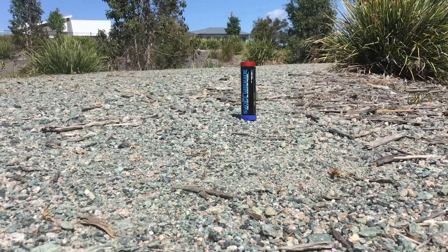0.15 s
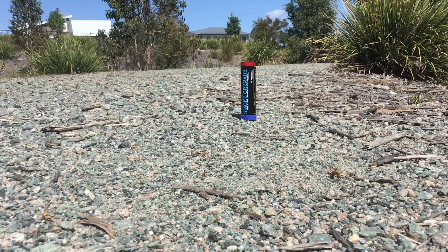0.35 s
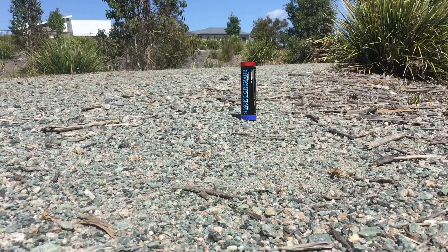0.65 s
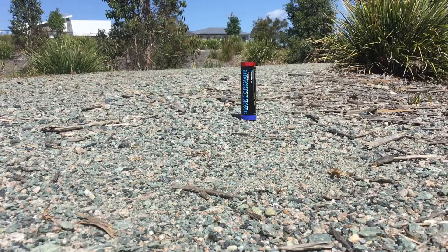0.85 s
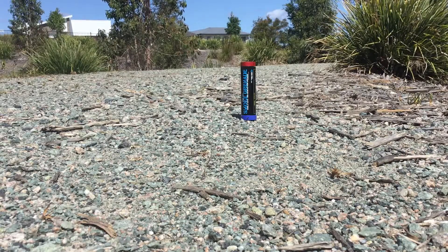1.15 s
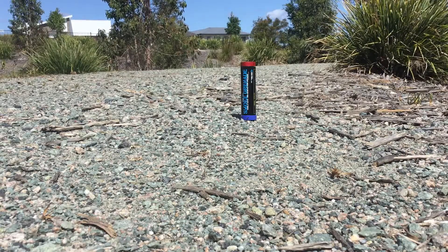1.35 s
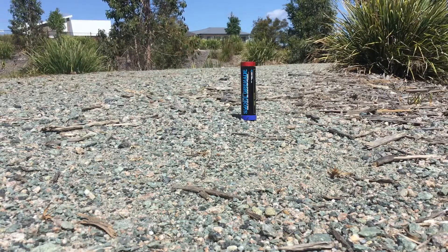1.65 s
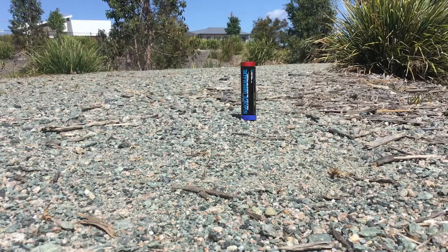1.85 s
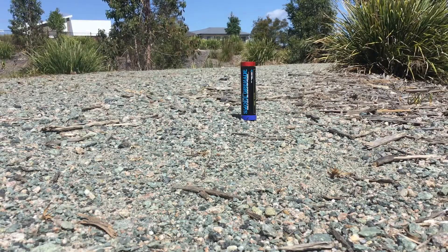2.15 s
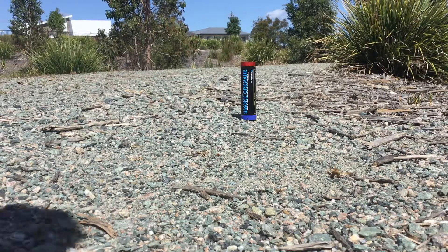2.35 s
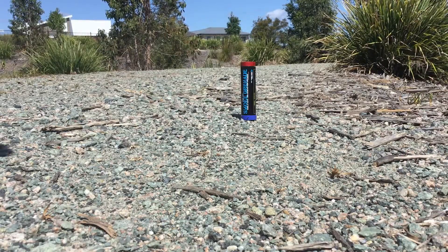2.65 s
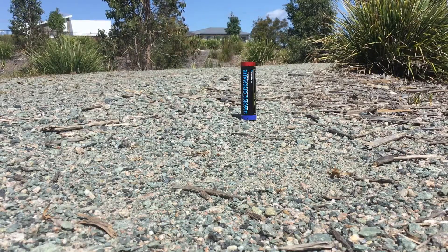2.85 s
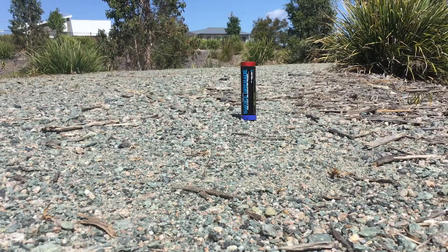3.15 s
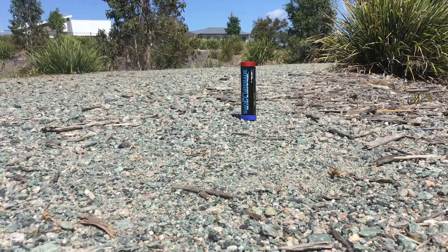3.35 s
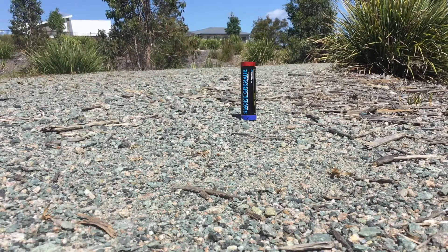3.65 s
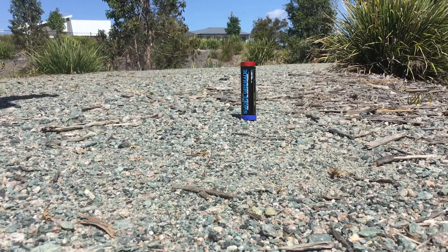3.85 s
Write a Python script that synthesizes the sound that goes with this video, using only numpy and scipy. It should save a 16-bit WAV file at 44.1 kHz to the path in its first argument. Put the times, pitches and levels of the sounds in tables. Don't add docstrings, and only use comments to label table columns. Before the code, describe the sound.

A walker shifts lightly on gravel, small stones ticking, then takes three loud crunchy steps close to a low microphone, pebbles scattering between them; soft cloth rustle and faint far traffic rumble in open air.

```python
import sys
import numpy as np
from scipy import signal
from scipy.io import wavfile

SR = 44100
rng = np.random.default_rng(int(sys.argv[2]) if len(sys.argv) > 2 else 0)


def generate_wav(signal):
    frames = np.transpose(np.atleast_2d(signal))
    scaled = np.clip(frames, -1, 1) * 32767
    pcm = np.round(scaled).astype(np.int16)
    wavfile.write(sys.argv[1], SR, pcm)


def elevation(decibels):
    levels = np.asarray(decibels, float)
    return 10 ** (levels / 20)


N = 176400
NEAR_S = 2.83


def rms_one(x):
    return x / np.sqrt(np.mean(x ** 2) + 1e-20)


def in_time(rows):
    s, *columns = np.transpose(rows)
    return [np.interp(np.arange(N) / SR, s, c) for c in columns]


def at_hz(points, hz):
    points_hz, points_db = np.transpose(points)
    return np.interp(np.log(hz), np.log(points_hz), points_db)


def drift(rate):
    r = np.exp(-80 * np.pi * rate / SR)
    noise = rng.standard_normal(N // 40 + 2002)
    slow = signal.lfilter([1], [1, -2 * r, r * r], noise)[2000:]
    return np.interp(np.arange(N) / 40, np.arange(len(slow)), rms_one(slow))


def ring(clicks, hz, t60):
    r, w = elevation(-60 / (t60 * SR)), 2 * np.pi * hz / SR
    return signal.lfilter([0, np.sin(w)], [1, -2 * r * np.cos(w), r * r], clicks + 1e-18)


def band_pass(x, low_hz, high_hz):
    return signal.sosfilt(signal.butter(2, [low_hz, high_hz], "band", fs=SR, output="sos"), x)


def banded_noise(spectrum, patchy_db):
    out, edges = 0, 28 * 2 ** np.arange(0, 9.4, 1 / 3)
    white = rng.standard_normal((2, N + SR // 4))
    for k, (low, high) in enumerate(zip(edges, edges[1:])):
        band = band_pass(white[k % 2], low, high)[-N:]
        hz = np.sqrt(low * high)
        below_db = min(0, 30 * np.log2(hz / spectrum[0][0]))
        out = out + elevation(at_hz(spectrum, hz) + below_db + patchy_db * drift(4.5)) * band
    return rms_one(out)


def add(track, s, sound):
    i = int(s * SR)
    track[i:i + len(sound)] += sound[:len(track) - i]


def traffic():
    # f/Hz, level/dB per Hz
    rumble_colour = [(18, -45), (30, -29), (55, 1), (183, -7.5), (382, -14.5), (645, -20.5), (1100, -37),
                     (10900, -47.5), (15800, -52)]
    # t/s, level/dB
    swell = [(0, -61.5), (1.3, -62), (2.2, -58), (4, -59)]
    return elevation(in_time(swell)[0] + 3.0) * banded_noise(rumble_colour, patchy_db=1.2)


def cloth():
    # t/s, level/dB
    rubbing = [(0, -80), (.3, -76.5), (.6, -85), (1.0, -75.5), (1.2, -81), (1.42, -85.5), (1.6, -75),
               (1.88, -83.5), (2.1, -71.5), (2.75, -68), (3.55, -65.5), (3.72, -72), (4, -65.5)]
    # f/Hz, level/dB per Hz
    fabric_colour = [(530, -36), (900, 0), (2460, -2), (2850, -2.5), (3370, -1.5), (15800, -20.5)]
    # t/s, level/dB, half length/s, lowest f/Hz, highest f/Hz
    swishes = [
        (1.647, -58.5, 0.012, 3240, 5160),
        (2.144, -53.5, 0.031, 4020, 9400),
        (3.104, -47.5, 0.0013, 10300, 12900),
        (3.306, -45.5, 0.012, 3800, 9400),
        (3.39, -49, 0.0033, 4500, 15000),
    ]
    out = elevation(in_time(rubbing)[0] + 6) * banded_noise(fabric_colour, patchy_db=0.8)
    white, t = rng.standard_normal(N), np.arange(N) / SR
    for s, db, half_s, low_hz, high_hz in swishes:
        hiss = rms_one(band_pass(white, low_hz, high_hz) + 0.092 * white)
        out = out + elevation(db) * hiss * np.exp(-((t - s) / half_s) ** 2)
    return out


def pebbles():
    # t/s, peak
    # level/dB, f/Hz
    loose_knocks = [(0.0506, -48, 3330), (0.0775, -50, 2400), (0.1004, -42.5, 2560), (0.128, -53, 1750),
                    (0.1812, -43.5, 2010), (0.2246, -39.5, 2930), (0.2366, -42, 1120), (0.3732, -52.5, 2460),
                    (0.4208, -44, 2900), (0.4505, -43, 3250), (0.471, -46, 1120), (0.4893, -47, 2480),
                    (0.5114, -53, 3080), (0.6384, -47.5, 2630), (0.647, -48, 4630), (0.6736, -44.5, 2630),
                    (0.707, -52, 2970), (0.7466, -48.5, 2730), (0.759, -49.5, 1950), (0.827, -52.5, 2420),
                    (0.88, -36, 2450), (0.954, -53.5, 2580),
                    (1.5268, -54.5, 1170), (1.5756, -47, 1310), (1.6026, -48.5, 1320), (1.6983, -47, 1350),
                  (1.7373, -50, 1160), (1.774, -51.5, 1120), (1.802, -48, 1200), (1.826, -51.5, 1090),
                  (1.928, -49, 1680), (1.959, -44.5, 2480), (2.0626, -34.5, 1165), (2.088, -44, 2390),
                  (2.207, -43.5, 2430), (2.371, -46.5, 2320), (2.457, -48, 1150), (2.5636, -44.5, 2230),
                  (2.7104, -47.5, 2360), (2.818, -36.5, 2570), (2.8473, -26, 1090),
                    (.0288, -57, 2640), (.387, -61, 2400), (0.529, -53, 2420), (.66, -54, 3100),
                    (0.7788, -55, 2460), (.8579, -64, 2570), (1.2341, -61, 2370), (1.351, -74, 2600),
                    (1.3663, -65, 2620), (1.378, -67, 2600), (1.456, -59.5, 2450), (1.539, -58, 1250),
                    (1.611, -53, 1300), (1.712, -59, 2500), (1.837, -60, 2400), (2.019, -54, 2570),
                    (2.079, -54, 2500), (2.274, -46.5, 2300), (2.502, -52, 6000), (2.572, -51, 2960),
                    (3.584, -47, 1800), (3.721, -44, 1630), (3.728, -46, 2000), (3.772, -41, 1900),
                    (3.776, -45, 1700), (3.790, -40, 2000)]
    # t/s, peak level/dB, f/Hz, overtone level/dB
    near_knocks = [(2.864, -28, 1290, -8), (2.871, -33.5, 1560, -4.5), (2.885, -21, 1670, -10),
                   (2.897, -34, 2330, -16), (2.935, -33, 1320, -7), (2.953, -35.5, 2410, -15),
                   (2.961, -35.5, 2470, -2.5), (2.969, -29, 1280, -21), (2.981, -40, 2400, 4),
                   (2.991, -43, 2370, -13), (2.998, -40, 2350, -13), (3.015, -42, 2000, -3),
                   (3.046, -39, 2260, -11), (3.058, -43, 2400, -7), (3.066, -41, 2420, -13),
                   (3.088, -44, 3030, -5), (3.116, -32.5, 3170, -4.5), (3.124, -42, 3000, 0),
                   (3.152, -40, 2200, 3), (3.161, -39, 3560, -3), (3.217, -36, 4200, -33),
                   (3.24, -38.5, 2130, -2), (3.272, -13, 597, -26.5), (3.280, -20, 620, -15),
                   (3.315, -15, 780, -22.5), (3.339, -16.5, 1110, -9), (3.363, -25, 1200, -8),
                   (3.372, -22, 1120, -29), (3.399, -35, 1330, -12), (3.4132, -12.5, 1230, -36),
                   (3.435, -33, 4830, -24), (3.459, -29.5, 1450, -21), (3.464, -26.5, 1550, -8.5),
                   (3.4836, -16, 1135, -10.5), (3.484, -17.5, 3920, -28), (3.506, -43, 2400, -6),
                   (3.554, -40.5, 2300, -14), (3.568, -36.5, 1600, -7), (3.628, -35, 2720, -20),
                   (3.666, -35.5, 1250, -5.5), (3.756, -40, 2310, -23), (3.804, -26.5, 1120, -5),
                   (3.823, -27, 1160, -0.5), (3.873, -27, 1830, -23), (3.878, -30, 1280, -15),
                   (3.906, -44, 3500, -12), (3.912, -23, 1210, -22), (3.917, -18, 2000, -6.5),
                   (3.966, -29.5, 1720, -13), (3.988, -29, 1220, -17)]
    contact_cycles = 0.72
    overtone_hz, overtone_octaves, overtone_slope_db = 2521, 1.56, -5.5
    out, t = np.zeros(N), np.arange(1500) / SR

    def tone(hz, cycles):
        attack = 1 - np.exp(-(t * hz / contact_cycles) ** 2)
        return np.sin(2 * np.pi * hz * t) * elevation(-60 * t * hz / cycles) * attack

    knocks = [(*row, -10.5) for row in loose_knocks] + [*near_knocks]
    for (s, db, hz, bright_db), luck in zip(knocks, rng.random((len(knocks), 12))):
        if s < NEAR_S:
            cycles, echo_db, overtone_t60_s = 13, -3, 0.018
        else:
            cycles, echo_db, overtone_t60_s = 10 * hz / 1896, -15, 0.0038
        neighbours = (0.405 + 0.2 * luck[0], 1.08 + 0.99 * luck[1])
        body = tone(hz, cycles) + elevation(-7.5) * sum(tone(hz * k, cycles) for k in neighbours)
        top = 0
        for u in overtone_octaves * (np.arange(8) + luck[2:10]) / 8:
            overtone = tone(overtone_hz * 2 ** u, overtone_t60_s * overtone_hz)
            top = top + overtone * elevation(overtone_slope_db * u)
        body, top = body / np.abs(body).max(), top / np.abs(top).max()
        knock = elevation(db) * (body + elevation(bright_db + 4.5) * top)
        add(out, s, knock)
        bounce_s = 0.002454 * (0.685 + 0.702 * luck[10])
        add(out, s + bounce_s, elevation(echo_db) * knock)
    return out


def crunch():
    # t/s, length/s, start level/dB, end level/dB, brightness/dB per octave
    presses = [(0.166, 0.057, -60, -55.5, 3), (0.24, 0.058, -86, -67, 1), (0.376, 0.17, -64.5, -65.5, 1.5),
               (0.617, 0.13, -69.5, -76, -2.5), (1.511, 0.34, -69, -67.5, -5),
               (1.877, 0.22, -73.5, -53.5, -0.5), (2.124, 0.14, -57.5, -66.5, 2.5),
               (2.292, 0.55, -68.5, -64, 2.5), (2.844, .04, -33, -43, -2), (2.894, 0.074, -39, -44, -.5),
               (2.976, 0.188, -58.5, -51.5, 1), (3.2, 0.12, -67.5, -44, 6), (3.27, 0.012, -34.5, -57, -9),
               (3.294, 0.059, -37.5, -33.5, -2.5), (3.37, 0.031, -41.5, -35.5, 1.5),
               (3.421, 0.018, -46, -40.5, 1), (3.451, .014, -45, -48.5, 3), (3.471, 0.025, -61, -40, -2),
               (3.527, 0.084, -69, -68, 3), (3.707, 0.18, -68, -46.5, -1), (3.792, 0.037, -42.5, -35.5, -2),
               (3.846, 0.048, -38, -41.5, -1.5), (3.907, 0.051, -39.5, -39.5, -1)]
    # f/Hz, level/dB per Hz
    gravel_colour = [(200, -13.5), (600, -1), (1150, 3), (1650, 1), (2500, -1.5), (5000, -10.5),
                     (7500, -21.5), (15500, -42)]
    # t/s, f/Hz
    stone_pitch = [(0, 2440), (2.8, 2160), (2.85, 1110), (2.92, 1940), (3.2, 2500), (3.27, 625),
                   (3.32, 800), (3.39, 1260), (3.46, 1920), (3.78, 1920), (3.8, 600), (3.86, 1340),
                   (4, 1510)]
    grains_per_s, clump_db, grain_spread_db, grain_colour_db = 1500, 4.5, 3, 5.5
    grain_cycles = 8.84
    stone_spread_octaves, skirt_db, usual_stone_hz = 1, 4, 1896
    rise_db_per_s, fall_db_per_s = 6000, 1201

    at = np.flatnonzero(rng.random(N) < grains_per_s * elevation(clump_db * drift(40)) / SR)
    s, length, start_db, end_db, bright = np.transpose(presses)[:, :, None]
    since = at / SR - s
    haste = np.where(s < NEAR_S, 0.25, 1)
    press_db = start_db + (end_db - start_db) * np.clip(since / length, 0, 1)
    rise_db = rise_db_per_s * np.minimum(since, 0)
    fall_db = fall_db_per_s * np.maximum(since - length, 0)
    load = elevation(press_db + haste * (rise_db - fall_db))

    size_db = grain_spread_db * np.minimum(rng.exponential(1, N), 4)[at]
    stone_hz = in_time(stone_pitch)[0][at] * 2 ** (stone_spread_octaves * rng.standard_normal(N)[at])
    dust = rng.standard_normal(N)
    out = plain = 0
    for hz in np.geomspace(200, 15000, 24):
        clicks, chance = np.zeros((2, N)), rng.standard_normal((2, N))[:, at]
        octaves = np.log2(hz / 1500)
        gravel_db = at_hz(gravel_colour, hz)
        off_pitch = np.log2(hz / stone_hz) ** 2 - np.log2(hz / usual_stone_hz) ** 2 / 2
        colour_db = grain_colour_db * np.clip(chance[1], -2, 2) - skirt_db * off_pitch
        clicks[0, at] = np.sign(chance[0]) * elevation(size_db + colour_db + gravel_db) * hz ** 2
        clicks[0] += dust * elevation(gravel_db - 13.5 + 4.5 * octaves) * hz ** 2
        pressure = (load * elevation(bright * octaves)).sum(axis=0)
        clicks[1] = clicks[0] * np.interp(np.arange(N), at, pressure)
        t60 = grain_cycles / hz
        unpressed, pressed = ring(ring(clicks, hz, t60), hz, t60)
        plain, out = plain + unpressed, out + pressed
    return out / np.std(plain)


def heels():
    # t/s, peak level/dB, f/Hz
    landings = [
        (2.635, -40.5, 235),
        (2.842, -34, 480),
        (2.85, -32, 192),
        (3.271, -38, 300),
        (3.293, -25, 614),
        (3.794, -29.5, 324),
    ]
    t60_s, rise_s = 0.11, 0.0023
    out, t = np.zeros(N), np.arange(6000) / SR
    for (s, db, hz), noise in zip(landings, rng.standard_normal((len(landings), 6000))):
        push = noise * elevation(-60 * t / t60_s) * np.minimum(t / rise_s, 1)
        thud = ring(ring(push, hz, 1.24 / hz), hz * 1.13, 0.83 / hz)
        add(out, s, elevation(db) * thud / np.abs(thud).max())
    return out


def ground(x):
    # f/Hz, width/Hz, level/dB
    hollows = [(1200, 390, -5.5), (2480, 390, -0.5), (3500, 920, -8), (4500, 1170, -3.5), (6140, 360, -11),
               (10500, 2700, -19.5), (13800, 2400, 0)]
    out = x
    for hz, width_hz, db in hollows:
        r = np.exp(-np.pi * width_hz / SR)
        poles = [1, -2 * r * np.cos(2 * np.pi * hz / SR), r * r]
        hollow = signal.lfilter((1 - r * r) / 2 * np.array([1, 0, -1]), poles, x)
        out = out + elevation(db + 3.13 * drift(3.6)) * hollow
    return out


def scene():
    gravel_and_cloth = ground(cloth() + pebbles() + crunch())
    return (traffic() + elevation(-4.5) * gravel_and_cloth + heels())[None]


def roll_off(x):
    return signal.sosfilt(signal.butter(12, 16480, fs=SR, output="sos"), x)


def record(dry):
    x = signal.sosfilt(signal.butter(2, 73, "high", fs=SR, output="sos"), dry)
    x = signal.sosfilt(signal.cheby2(12, 60, 16500, fs=SR, output="sos"), x)
    return roll_off(x)


dry = scene()
out = record(dry)
generate_wav(out)
```